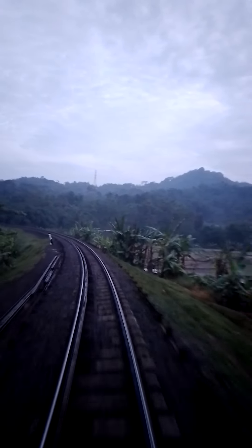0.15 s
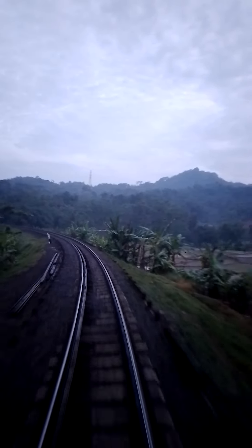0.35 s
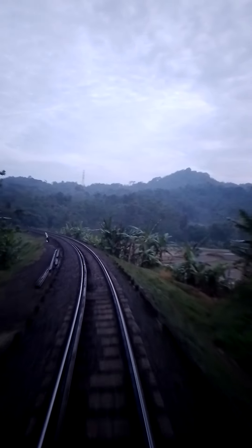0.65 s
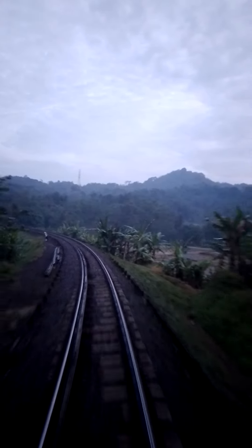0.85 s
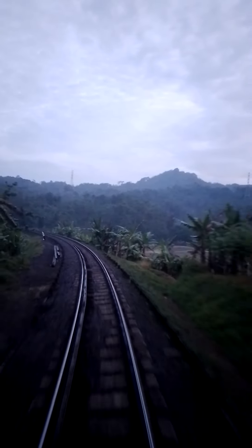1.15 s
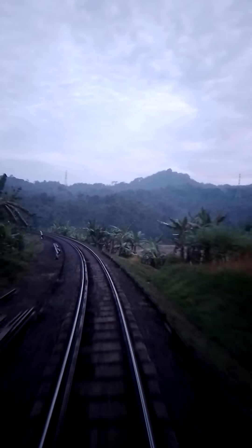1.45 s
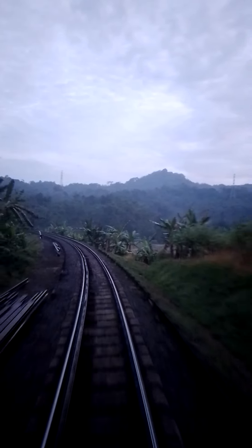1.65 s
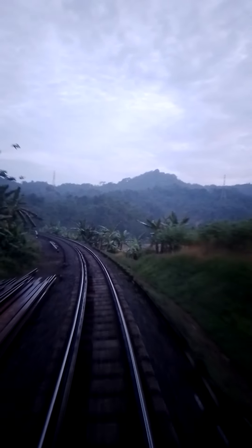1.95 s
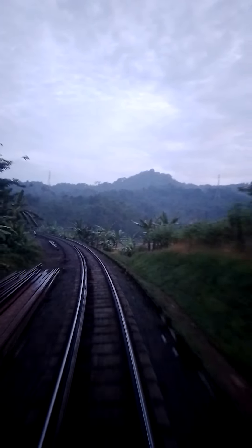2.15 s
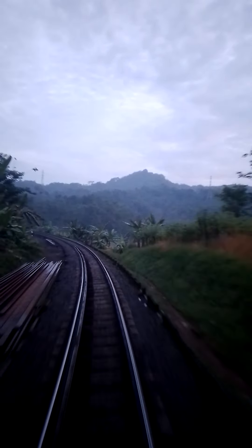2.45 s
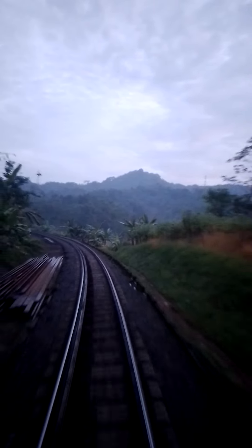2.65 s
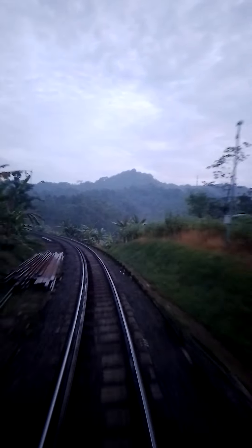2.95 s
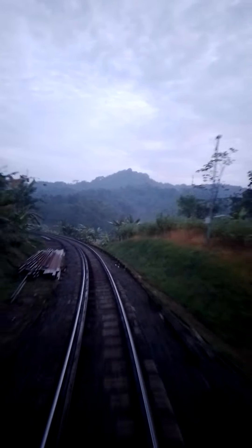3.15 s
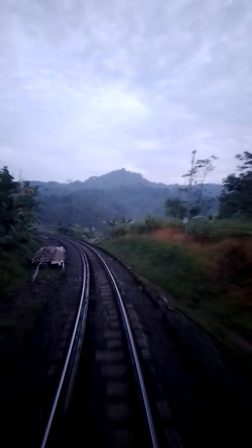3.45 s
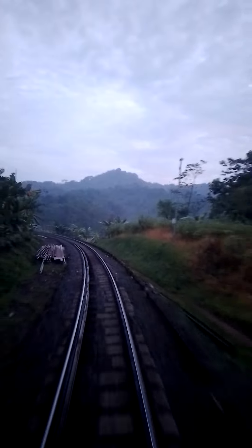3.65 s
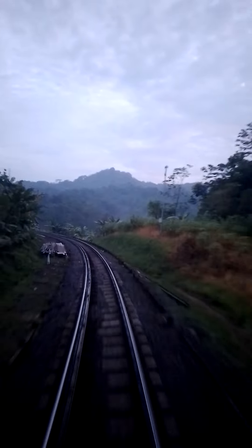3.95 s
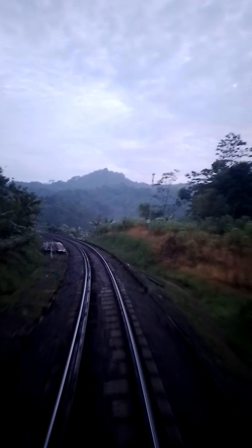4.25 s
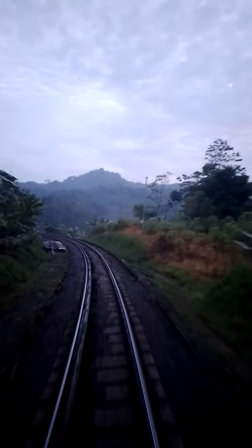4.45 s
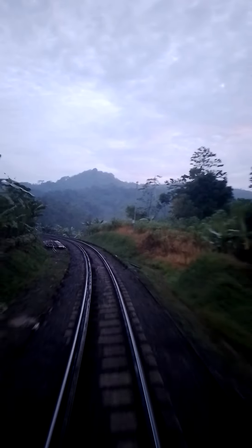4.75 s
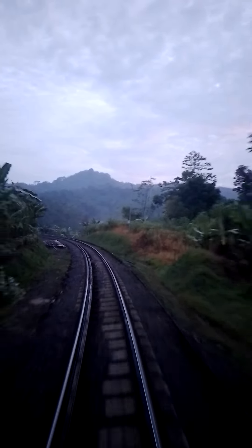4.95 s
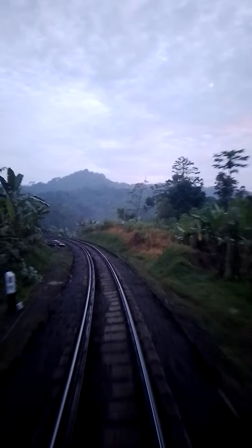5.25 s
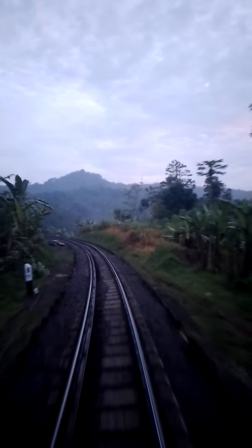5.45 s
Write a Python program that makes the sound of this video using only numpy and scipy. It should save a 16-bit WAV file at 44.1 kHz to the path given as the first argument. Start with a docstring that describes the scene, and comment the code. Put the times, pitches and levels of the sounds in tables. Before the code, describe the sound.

A train rounds a curve, heard in stereo inside its small cab. From the start a thick low rumble, strongest around the boomy low-mids, shakes unevenly, with brief panel drones and frequent dull thumps. Over it steel grinds in a rough, fluttering growl with fine grit. A sharp high squeal opens the sound; thinner, fuzzy, wavering squeals follow, notably around 0.9, 1.65 to 2.3, 2.7 to 3.1 and 3.3 seconds. Joint clatter with light clanks comes at 0.2 and 1.3; the loudest, a rapid cluster of steel blows with scrape and hiss, hits at 1.95, then another at 2.45 and a weaker one at 2.9. From 3.8 to 4.2 come more knocks, growl, hiss and a last clear squeal. At about 4.3 the noise eases quickly, leaving subdued rumble, faint hum and whine, a soft thump near 4.9, a small swell of roar at 5.1, and a slight rattle at the end.

```python
"""A low rumble and thumps on uneven rail, under a grinding growl and thin squeals, inside a train cab on a curve.
The wheels shake the body as shaped noise and ring its modes; rail joints set off bursts of clatter and clanks.
The flanges hiss and squeal on the rail until the noise eases off at about 4.3 s; hum, whine and roar lie behind.
Two microphone ports in the cab, each with its own treble resonance, pick up the sound."""
import sys
import numpy as np
from scipy import signal
from scipy.fft import rfft, irfft
from scipy.io import wavfile

SR = 44100
rng = np.random.default_rng(int(sys.argv[2]) if len(sys.argv) > 2 else 0)


def unload_wav(signal):
    """Save mono or channel-first audio to the path in sys.argv[1] as 16-bit WAV at rate SR, clipped to [-1, 1]."""
    wavfile.write(
        sys.argv[1],
        SR,
        np.round(np.clip(np.atleast_2d(signal).T, -1, 1) * 32767).astype(np.int16),
    )


N = 246519
TIME = np.arange(N) / SR
BINS_HZ = np.fft.rfftfreq(N, 1 / SR)

# All levels are relative: each source sets its own gain on top.
# rolling force on the car body: (time [s], level [dB])
ROLLING_FORCE = [(0.0, -18), (0.15, -23.5), (0.31, -22), (0.36, -27.5), (0.67, -24.5), (0.75, -29),
                 (0.86, -20), (0.9, -23), (1.06, -22.5), (1.1, -23.5), (1.35, -24.5), (1.51, -28),
                 (1.58, -23), (1.68, -26), (1.78, -22.5), (2.02, -19.5), (2.15, -26.5), (2.41, -26),
                 (2.46, -20), (2.66, -30.5), (2.74, -23), (2.9, -25.5), (2.97, -19.5), (3.13, -27.5),
                 (3.35, -24.5), (3.44, -25.5), (3.49, -19), (3.61, -27), (3.67, -21), (3.74, -25.5),
                 (4.0, -20), (4.16, -20.5), (4.25, -31.5), (4.3, -22), (4.45, -32.5), (5.03, -32.5),
                 (5.2, -33.5), (5.28, -40.5), (5.43, -38.5), (5.57, -31)]
# spectrum of the rumble: (frequency [Hz], density [dB per Hz])
RUMBLE_SPECTRUM = [(25, -60), (60, -54), (105, -35), (138, -27), (162, -30.5), (200, -29), (225, -12),
                   (275, -3.5), (335, -1), (400, -9), (480, -12), (580, -15), (700, -30), (1000, -30.5),
                   (2000, -55)]
# floor modes, the low one first: (frequency [Hz], width [Hz], level [dB])
FLOOR_MODES = [(137.5, 18, -18), (279.6, 26, 2.5)]
# cab panels that colour the rolling noise: (frequency [Hz], width [Hz], lift [dB])
PANEL_MODES = [(190.7, 18, 11.5), (430, 8.7, 3.5), (472, 9.4, 4.5), (640, 9.4, 3), (740, 10, 7),
               (825, 18, 0), (1448, 66, 2), (1537, 38, 2.5), (2123, 28, 5.5), (2310, 23, 6),
               (2505, 51, 3.5)]
# the loudest thumps of the running gear: (time [s], level [dB], hardness [dB per octave])
THUMPS = [(0.039, -0.5, -7), (0.109, -3.5, -4), (0.183, 2.5, 25), (0.203, -2, -7), (0.245, -3, -5),
          (0.308, 0, -1), (0.539, -4, -5), (0.639, -5, -4), (0.662, -6, -2), (0.802, -3, -3), (0.85, 2, 13),
          (0.977, 2, -5), (1.022, -1, -7), (1.048, 3, -5), (1.257, 1.5, -10), (1.338, -0.5, 33),
          (1.556, -4.5, -18), (1.75, 2, -6), (1.79, 0.5, -4), (1.851, -3.5, 0), (1.872, -3, 7),
          (1.902, 1, -3), (2.021, -4, -10), (2.071, -5, -9), (2.179, -6, -7), (2.803, -7, -10),
          (2.877, -2, 20), (2.926, 2, 12), (3.005, -1, 5), (3.075, -3.5, 2), (3.168, -5, 2), (3.486, 4, 0),
          (3.545, -2, 0), (3.703, -2.5, 2), (3.862, 0.5, -6), (4.024, 3.5, -8), (4.1, 0, -5),
          (4.287, 1.5, -31), (4.458, -16, 5), (4.875, -7, -1), (5.039, -9.5, -23)]
# car body under a thump: (frequency [Hz], level [dB], decay by 60 dB [s])
BODY_MODES = [(307, -5, 0.037), (327, 11.5, 0.053), (347, 19, 0.039), (448, 1, 0.074)]
# spectra of grinding, low growl and fine grit: (frequency [Hz], density [dB per Hz])
GROWL_SPECTRUM = [(200, -14), (420, 13), (620, 5.5), (830, 4), (1150, 0.5), (1500, 0.5), (1850, -3),
                  (2250, -1.5), (2700, -20), (3300, -68), (6000, -35)]
GRIT_SPECTRUM = [(1500, -13.5), (2800, 4), (3350, -1), (3800, -1), (4400, -4), (5300, -3.5), (6500, -9.5),
                 (9000, -5), (14000, -29)]
# the growl turns darker or brighter as the contact patch shifts: (time [s], tilt [dB])
GROWL_TILT = [(0, 5), (0.6, -0.5), (1.4, -2), (1.75, -0.5), (2.3, 3.5), (2.8, 0), (3.25, 2.5), (3.7, -1.5),
              (4.2, 3), (4.6, 0.5), (5.42, 3.5)]
# the wheels scrape harder for a moment: (start [s], hold [s], growl level [dB], grit level [dB])
SCRAPES = [(0.0, 0.11, -37, -50.5), (0.197, 0.13, -38, -56), (0.4, 0.13, -41, -71),
           (0.566, 0.055, -37, -56), (0.93, 0.2, -38.5, -55.5), (1.146, 0.058, -35.5, -57),
           (1.237, 0.19, -38, -61.5), (1.79, 0.17, -34.5, -53), (1.957, 0.042, -29.5, -40.5),
           (2.037, 0.11, -40, -58), (2.204, 0.14, -39, -59), (2.442, 0.058, -29.5, -46),
           (2.655, 0.13, -40.5, -88), (2.85, 0.096, -38.5, -59), (2.966, 0.072, -33.5, -55),
           (3.13, 0.15, -39.5, -62), (3.297, 0.037, -38.5, -55), (3.944, 0.086, -34, -51.5),
           (4.107, 0.074, -32, -52.5), (4.274, 0.035, -35.5, -70), (5.555, .04, -43, -74)]
# a flange bites and squeals: (start [s], hold [s], level [dB], pitch before bend and drift [Hz], mode name)
SQUEALS = [(0.0, 0.078, -39, 10200, "high"), (0.002, 0.057, -58, 12100, "top"),
           (0.025, 0.061, -38, 7110, "main"), (0.15, 0.076, -50, 10700, "high"),
           (0.154, 0.15, -46, 7380, "main"), (0.372, 0.28, -59, 7460, "thin"),
           (0.44, 0.2, -54.5, 10660, "high"), (0.669, 0.28, -52.5, 7370, "thin"),
           (0.931, 0.5, -43, 7450, "main"), (0.978, 0.22, -50, 10600, "high"),
           (1.168, 0.065, -47, 10560, "keen"), (1.643, 0.08, -49.5, 10500, "high"),
           (1.651, 0.24, -44.5, 7430, "main"), (1.74, 0.26, -39, 7180, "main"),
           (1.815, 0.07, -45, 6000, "low"), (1.85, 0.12, -46, 10300, "high"), (2, 0.05, -51, 5300, "rasp"),
           (1.94, 0.16, -43.5, 10280, "high"), (1.96, 0.054, -44, 5900, "rasp"),
           (1.962, 0.14, -37, 8010, "main"), (1.97, 0.07, -47, 5200, "rasp"),
           (2.064, 0.06, -47, 6140, "rasp"), (2.177, 0.15, -39.5, 7040, "main"),
           (2.193, 0.05, -44, 6160, "rasp"), (2.214, 0.093, -43, 10330, "keen"),
           (2.26, 0.048, -49.5, 6020, "low"), (2.451, 0.14, -49, 10470, "keen"),
           (2.454, 0.21, -45, 7000, "main"), (2.711, 0.045, -38.5, 6870, "main"),
           (2.713, 0.037, -42, 7100, "thin"), (2.749, 0.13, -54, 6130, "low"),
           (2.864, 0.044, -40.5, 6950, "main"), (2.866, 0.055, -43, 7140, "thin"),
           (2.886, 0.04, -48, 6200, "low"), (2.949, 0.11, -49, 6250, "rasp"),
           (2.979, 0.076, -41, 7270, "main"), (3.099, 0.13, -46, 7000, "main"),
           (3.329, 0.087, -37, 6880, "main"), (3.475, 0.037, -48, 7010, "thin"),
           (4.007, 0.086, -49, 7230, "thin"), (4.08, 0.11, -45, 7290, "thin"),
           (4.5, 0.092, -60, 12900, "top"), (4.136, 0.088, -40, 7230, "main"),
           (4.141, 0.083, -51, 5860, "ring")]
# wheel modes: name -> (left [dB], right [dB], fuzz width [Hz], whistle width [Hz], whistle level [dB])
WHEEL_MODES = {"rasp": (-1, -19, 800, 200, -14), "low": (0, -17, 420, 100, -4),
               "ring": (0, -19, 260, 55, 13), "main": (-8.5, -23, 816, 111, -26),
               "thin": (-6, -23, 305, 113, 1.5), "high": (-21, -2, 1200, 200, -23),
               "keen": (-13, -3, 550, 160, -22), "top": (-1, 19.5, 1300, 250, -14)}
# flange sliding along the rail head: (time [s], hiss level [dB])
SLIDING = [(0.0, -38.5), (0.08, -64), (0.2, -60), (1.9, -52.5), (2.01, -52), (2.22, -60), (2.43, -63),
           (2.48, -65), (2.69, -64), (3.01, -56), (3.27, -71), (3.75, -88), (4.18, -50), (4.33, -70),
           (4.78, -79), (4.95, -60.5), (5.26, -82), (5.59, -67)]
# spectrum of the flange hiss: (frequency [Hz], density [dB per Hz])
HISS_SPECTRUM = [(3500, -1.5), (5500, 1), (6500, -3), (8000, 0), (9500, 4), (11000, -2), (12500, 1),
                 (14200, 5)]
# clatter over rail joints: (time [s], level [dB], decay by 60 dB [s])
JOINTS = [(0.181, -30, 0.15), (0.584, -46, 0.26), (1.324, -28, 0.19), (1.939, -17.5, 0.13),
          (2.445, -22, 0.14), (2.915, -33, 0.41), (3.815, -34, 0.26), (3.964, -35, 0.2), (4.119, -25, 0.21),
          (5.55, -43.5, 0.25)]
# spectrum of the clatter: (frequency [Hz], density [dB per Hz])
CLATTER_SPECTRUM = [(200, -23), (400, 15.5), (600, 7), (850, 1.5), (1300, -2), (2300, -4), (3200, -26),
                    (6000, -35)]
# steel strikes steel at the worst joints: (time [s], level [dB])
CLANKS = [(0.19, -28.5), (1.343, -26), (1.944, -19.5), (1.955, -15), (1.966, -16.5), (1.979, -19),
          (1.989, -22), (2.449, -23), (2.458, -32), (2.475, -29), (2.492, -28), (2.955, -27),
          (3.826, -33.5), (3.975, -29), (4.133, -24.5), (4.157, -26)]
# bogie frame under a clank, before detuning: (frequency [Hz], level [dB], decay by 60 dB [s])
FRAME_MODES = [(382, -0.5, 0.1), (509, -5.5, 0.13), (566, -10.5, 0.13), (647, -8, 0.12), (829, -7, 0.22),
               (961, -11.5, 0.087), (1126, -14, 0.09), (1298, -16.5, 0.074), (1440, -14, 0.097),
               (1630, -10.5, 0.089), (2324, -15, 0.089), (2560, -15, 0.096)]
# shaking sets one part of the shell droning: (start [s], hold [s], level [dB], mode name)
DRONES = [(0.0, 0.054, -20, "floor"), (0.11, 0.15, -19.5, "floor"), (0.115, 0.18, -30, "window"),
          (0.13, 0.083, -21.5, "wall"), (0.22, 0.11, -25.5, "roof"), (0.51, 0.081, -25.5, "roof"),
          (0.6, 0.074, -28, "door"), (0.81, 0.056, -22, "door"), (0.815, 0.051, -30, "window"),
          (0.95, 0.09, -21, "door"), (0.99, 0.078, -22.5, "floor"), (1.03, 0.099, -29.5, "wall"),
          (1.1, 0.053, -24.5, "door"), (1.17, 0.13, -28.5, "roof"), (1.66, 0.25, -27.5, "floor"),
          (1.72, 0.066, -28, "desk"), (1.92, 0.057, -21, "desk"), (1.93, 0.031, -22.5, "screen"),
          (1.96, 0.12, -20, "floor"), (2.03, 0.09, -29, "wall"), (2.82, 0.19, -28, "roof"),
          (2.91, 0.067, -30.5, "window"), (3.2, 0.083, -28, "desk"), (3.28, 0.083, -29, "roof"),
          (3.63, 0.073, -25, "roof"), (3.95, 0.19, -30, "wall"), (3.97, 0.065, -26.5, "roof"),
          (4.1, 0.05, -28, "window")]
# ringing modes of the cab shell: name -> (frequency before waver [Hz], phase between the ports [rad])
SHELL_MODES = {"floor": (275, 0.35), "roof": (299, 0.37), "door": (325, 0.33), "desk": (366, 0.46),
               "wall": (422, 0.9), "window": (474, 1.24), "screen": (513, 0.96)}
# roar of the track bed: spectrum (frequency [Hz], density [dB per Hz])
ROAR_SPECTRUM = [(400, -28), (600, 0.5), (900, -5.5), (1100, -26), (2000, -62)]
# and its course: (time [s], level [dB])
ROAR_LEVEL = [(0, -49), (4.38, -46), (4.6, -52), (4.8, -57), (5.05, -53), (5.11, -45.5), (5.22, -51),
              (5.3, -57), (5.44, -66), (5.59, -47)]
# whine of the traction gear: (frequency before waver [Hz], level [dB])
WHINE_TONES = [(780.6, -62.5), (2121, -80)]
# steady hum of the cab: (frequency [Hz], width [Hz], level [dB])
HUM_MODES = [(134.6, 23, -58), (235.7, 19, -44)]
# spectrum of the cab's low drone: (frequency [Hz], density [dB per Hz])
CAB_SPECTRUM = [(25, -35), (60, -11), (110, -11), (165, -21), (220, 0), (300, -4), (380, 2.5), (550, -7),
                (780, -29), (950, -44), (2000, -73)]
# likeness of the two ports: (frequency [Hz], coherence)
PORT_LIKENESS = [(60, 0.92), (250, 0.91), (340, 0.9), (430, 0.39), (600, -0.085), (1100, -0.13),
                 (1700, -0.09), (2400, 0.014)]
# sound that comes straight from the right-hand rail: (frequency [Hz], share)
DIRECT_SHARE = [(380, 0.0082), (800, 0.08), (2800, 0.15), (6000, 0.14), (12000, 0.0022)]
# colour of each microphone port: (frequency [Hz], gain [dB])
LEFT_PORT = [(300, 0.5), (1100, 2), (1500, 3.5), (2300, -2.5), (4500, -0.5), (5600, 3), (6700, 9.5),
             (7450, 13), (8300, 1), (9100, -6), (11000, -6), (14000, -11.5)]
RIGHT_PORT = [(300, 1), (1100, 2), (1500, -2), (2300, 0), (4500, -0.5), (6500, 2), (8000, -3.5), (9100, -3),
              (9650, 3), (10400, 8.5), (11400, 4.5), (12200, -3), (14000, -5)]

USUAL_ROLLING_DB = -23
EASE_AT_S, EASE_S = 4.33, 0.08  # the flanges stop pressing: middle and length of the change
SQUEAL_RISE_S, SQUEAL_T60_S, SQUEAL_SAG_HZ_PER_S = 0.0049, 0.55, 180
BITE_SHARP, BITE_S = 0.012, 0.07  # a squeal starts sharp by this share, and settles
LEFT_LAG_S = 20.5 / SR  # direct sound reaches the left port this much later
EDGE_HZ = 14300  # upper band limit


def rumble(level_db, sway_db, throb_db):
    """Rail roughness shakes the car body unevenly; the floor sways in its low mode and booms in its upper one."""
    roar = patchy(noise(panelled(RUMBLE_SPECTRUM)), depth_db=3, width_hz=14, span_s=0.07, size=4096)
    roar = steadied(roar, span_s=0.025)
    deep = low_part(roar, edge_hz=890)
    # duller on smooth running
    roar = deep + (roar - deep) * pressing(level_db=0.5, follow=0.055, eased_db=-16.0)
    roar = roar * amp(curve(ROLLING_FORCE) + level_db + throb_db * wander(42.0))

    low, upper = (amp(db) * steadied(noise(bell(hz, width)), span_s=0.039) for hz, width, db in FLOOR_MODES)
    shocks = [(start, hold, db) for start, hold, db, mode in DRONES if mode == "floor"]
    swaying = pressing(level_db=-34.0, follow=0.38, eased_db=-12.0)
    swaying = swaying + bursts(shocks, rise_s=0.018, t60_s=0.82) * amp(sway_db)
    booming = pressing(level_db=-43.5, follow=0.6, eased_db=-2.5)
    return roar + low * swaying + upper * booming


def thumps(level_db, rise_s):
    """Each bump of the running gear rings the low modes of the body; hard ones favour the upper modes."""
    t = np.arange(SR // 4) / SR
    rings = np.array([amp(db - 60 * t / t60) * np.sin(2 * np.pi * hz * t) for hz, db, t60 in BODY_MODES])
    rings = rings * (1 - np.exp(-(t / rise_s) ** 2))
    octaves = np.log2([hz / BODY_MODES[1][0] for hz, _, _ in BODY_MODES])
    out = np.zeros(N + len(t))
    for start, db, hardness in THUMPS:
        out[round(start * SR):][:len(t)] += amp(db + hardness * octaves) @ rings
    return out[:N] * amp(level_db) / abs(rings.sum(0)).max()


def grinding(growl_db, grit_db, chatter_db, pivot_hz, rise_s, t60_s):
    """Steel grinds on steel in quick uneven slips: a growl with fine grit above it, swelling at each scrape."""
    slips = amp(chatter_db * wander(54))
    growl = patchy(noise(panelled(GROWL_SPECTRUM)), depth_db=2.5, width_hz=45, span_s=0.05, size=2048)
    dark = low_part(growl, pivot_hz)
    tilt = amp(curve(GROWL_TILT))
    growl = dark / tilt + (growl - dark) * tilt

    growl_scrapes = bursts([(start, hold, db) for start, hold, db, _ in SCRAPES], rise_s, t60_s)
    growl_scrapes = growl_scrapes * pressing(level_db=0, follow=0, eased_db=-7.0)
    grit_scrapes = bursts([(start, hold, db) for start, hold, _, db in SCRAPES], rise_s, t60_s)
    growl_level = np.hypot(pressing(level_db=-47.5, follow=0.19, eased_db=-6.0), growl_scrapes)
    grit_level = np.hypot(pressing(level_db=-60.0, follow=0.2, eased_db=-3.5), grit_scrapes)

    growl = growl * growl_level * amp(growl_db)
    grit = noise(panelled(GRIT_SPECTRUM)) * grit_level * amp(grit_db)
    return slips * (growl + grit)


def squeals(waver_hz, drift_hz, flutter_db, swell_db):
    """Each bite of a flange swells unevenly, holds and rings out, drifting and sagging a little in pitch."""
    waver = waver_hz * wander(27)
    drift = drift_hz * wander(19)
    swells = {mode: amp(swell_db * wander(27)) for mode in WHEEL_MODES}
    out = np.zeros((2, N))
    for start, hold, db, hz, mode in SQUEALS:
        span = slice(max(round(start * SR), 0), round((start + hold + SQUEAL_T60_S) * SR))
        age = TIME[span] - start
        pitch = hz * (1 + BITE_SHARP * np.exp(-age / BITE_S)) - SQUEAL_SAG_HZ_PER_S * (age - hold / 2)
        ring = wheel_ring(mode, pitch, waver[span], drift[span])
        level = amp(db) * swells[mode][span] * envelope(age, hold, SQUEAL_RISE_S, SQUEAL_T60_S)
        out[:, span] += ring * level
    return out * amp(flutter_db * wander(58)) * pressing(level_db=0.5, follow=0.062, eased_db=-11)


def wheel_ring(mode, hz, waver_hz, drift_hz):
    """Stick-slip drives one wheel mode: a thin wavering whistle inside a fuzzy band."""
    left_db, right_db, fuzz_width, whistle_width, whistle_db = WHEEL_MODES[mode]
    fuzz, whistle = rng.standard_normal((2, 2, 2 * SR))[..., :len(hz)]
    fuzz = unit(resonate(fuzz, hz + drift_hz, fuzz_width))
    whistle = unit(resonate(whistle, hz + waver_hz, whistle_width))
    return unit(fuzz + amp(whistle_db) * whistle) * amp([[left_db], [right_db]])


def flange_hiss(flutter_db, pivot_hz, top_db, dulling_db_per_s):
    """The sliding flange gives a wide, bright hiss whose top dulls along the curve."""
    hiss = noise(amp(read(HISS_SPECTRUM)))
    dark = low_part(hiss, pivot_hz)
    hiss = dark + (hiss - dark) * amp(top_db - dulling_db_per_s * TIME)
    level = amp(curve(SLIDING) + flutter_db * wander(36))
    return hiss * level * pressing(level_db=9.5, follow=0.14, eased_db=-1.0)


def joints(level_db, rise_s, hold_s, rattle_db):
    """A wheel drops over a joint; the bogie rattles hard for a moment, then dies down."""
    force = sum(amp(db) * envelope(TIME - start, hold_s, rise_s, t60) for start, db, t60 in JOINTS)
    clatter = steadied(noise(panelled(CLATTER_SPECTRUM)), span_s=0.0067)
    return clatter * force * amp(level_db + rattle_db * wander(180))


def clanks(level_db, rise_s, detune):
    """Each blow rings the bogie frame, a little differently each time and at each port."""
    t = np.arange(SR // 4) / SR
    hz, db, t60 = np.transpose(FRAME_MODES)[:, :, None]
    out = np.zeros((2, N))
    for start, blow_db in CLANKS:
        pitch, left, right = rng.uniform(-0.92, 1, (3, len(hz), 1))
        turns = hz * (1 + detune * pitch) * t + np.array([left, right]) / 2
        rings = amp(blow_db + db - 60 * t / t60) * np.sin(2 * np.pi * turns)
        out[:, round(start * SR):][:, :len(t)] += rings.sum(1) * (1 - np.exp(-(t / rise_s) ** 2))
    return out * amp(level_db)


def drones(level_db, rise_s, t60_s, waver_hz, throb_db):
    """Each part of the shell rings almost purely while it is shaken, wavering in pitch and strength."""
    waver = waver_hz * wander(15)
    throb = amp(throb_db * wander(22))
    out = np.zeros((2, N))
    for start, hold, db, mode in DRONES:
        hz, port_phase = SHELL_MODES[mode]
        span = slice(max(round(start * SR), 0), round((start + hold + t60_s) * SR))
        phase = 2 * np.pi * (np.cumsum(hz + waver[span]) / SR + rng.random())
        ring = np.sqrt(2) * np.sin([phase, phase + port_phase])
        out[:, span] += ring * amp(db) * envelope(TIME[span] - start, hold, rise_s, t60_s)
    return out * throb * amp(level_db)


def track_roar(level_db):
    """The track bed roars more or less as the ground under the train changes."""
    return noise(amp(read(ROAR_SPECTRUM))) * amp(curve(ROAR_LEVEL) + level_db)


def whine(waver, flutter_db, port_phase):
    """The traction gear sings faint, wavering tones that sink away as the rolling force falls."""
    running_s = np.cumsum(1 + waver * wander(11.5)) / SR
    phases = np.array([[0], [port_phase]])
    tones = sum(amp(db) * np.sin(2 * np.pi * hz * running_s + phases) for hz, db in WHINE_TONES)
    return np.sqrt(2) * tones * amp(flutter_db * wander(12)) * pressing(level_db=4.5, follow=0.57, eased_db=0)


def cab(air_db):
    """The steady low drone of the cab with a few humming resonances."""
    hum = sum(amp(db) * noise(bell(hz, width)) for hz, width, db in HUM_MODES)
    return hum + amp(air_db) * noise(amp(read(CAB_SPECTRUM)))


def reflected(x, share, count=14):
    """Windows and walls of the small cab send back early echoes, different at each port."""
    taps = np.zeros((2, SR // 50))
    taps[:, 0] = 1
    for port in taps:
        port[rng.integers(30, len(port), count)] = share * rng.choice([-1, 1], count) / np.sqrt(count)
    return signal.oaconvolve(x, taps, axes=1)[:, :N] / np.sqrt(1 + share ** 2)


def noise(gain):
    """Coloured noise in the cab: the ports share the bass, and a little treble reaches the right one first."""
    a, b = rfft(rng.standard_normal((2, N)))
    same = read(PORT_LIKENESS) + read(DIRECT_SHARE) * np.exp(2j * np.pi * BINS_HZ * LEFT_LAG_S)
    apart = np.sqrt(np.maximum(1 - abs(same) ** 2, 0))
    return unit(irfft(np.array([a, same * a + apart * b]) * gain, N))


def panelled(spectrum):
    """Gain of a spectrum that reaches the cab through its ringing panels."""
    return amp(read(spectrum) + sum(db * bell(hz, width) for hz, width, db in PANEL_MODES))


def bell(hz, width):
    """Gain of one resonance over frequency."""
    return 1 / (1 + (2 * (BINS_HZ - hz) / width) ** 2)


def patchy(x, depth_db, width_hz, span_s, size):
    """Short-lived resonances come and go at random places in the spectrum."""
    z = signal.stft(x, nperseg=size, noverlap=size * 3 // 4)[2]
    field = rng.standard_normal(z.shape[1:])
    # smooth the random field over frequency, then over time
    for axis, cells in enumerate([width_hz * size / SR, span_s * SR / (size // 4)]):
        window = np.exp(-(np.arange(-40, 41) / cells) ** 2)
        field = signal.fftconvolve(field, np.expand_dims(window, 1 - axis), "same")
    gain = unit(amp(depth_db * np.clip(unit(field), -2, 2)))
    return signal.istft(z * gain, nperseg=size, noverlap=size * 3 // 4)[1][:, :N]


def steadied(x, span_s):
    """Evens out the slow swells of a noise and leaves its fast flutter."""
    window = np.exp(-(np.arange(-SR // 4, SR // 4) / SR / span_s) ** 2)
    power = signal.fftconvolve((x ** 2).mean(0), window / window.sum(), "same")
    return unit(x / np.sqrt(abs(power) + 1e-6))


def resonate(x, hz, width):
    """A resonance that follows the curve hz, with steep skirts."""
    turn = np.exp(2j * np.pi * np.cumsum(hz) / SR)
    r = np.exp(-np.pi * abs(width) / SR)
    # shift the pitch down to zero, filter there, shift back
    return (turn * signal.lfilter([(1 - r) ** 2], [1, -2 * r, r * r], x / turn)).real


def low_part(x, edge_hz):
    """The part of a sound below edge_hz."""
    return irfft(rfft(x) / (1 + (BINS_HZ / edge_hz) ** 10), N)


def pressing(level_db, follow, eased_db):
    """A gain that follows the rolling force and shifts by eased_db once the flanges stop pressing."""
    eased = np.clip((TIME - EASE_AT_S) / EASE_S + .5, 0, 1)
    return amp(level_db + follow * (curve(ROLLING_FORCE) - USUAL_ROLLING_DB) + eased_db * eased)


def envelope(age, hold_s, rise_s, t60_s):
    """Attack, hold and release of one event, over its age in seconds."""
    age = np.maximum(age, 0)
    return (1 - np.exp(-age / rise_s)) * amp(-60 * np.maximum(age - hold_s, 0) / t60_s)


def bursts(rows, rise_s, t60_s):
    """Joint level of events (start [s], hold [s], level [dB]) that share one attack and release."""
    t = TIME[::32]  # coarse steps are enough for a level
    power = sum((amp(db) * envelope(t - start, hold, rise_s, t60_s)) ** 2 for start, hold, db in rows)
    return np.interp(TIME, t, np.sqrt(power))


def wander(rate_hz):
    """Slow chance of rms 1."""
    return unit(irfft(rfft(rng.standard_normal(N)) * np.exp(-(BINS_HZ / rate_hz) ** 2), N))


def curve(rows):
    """A table over time, at every sample."""
    return np.interp(TIME, *np.transpose(rows))


def read(points):
    """A table over frequency, joined on a log axis."""
    hz, value = np.transpose(points)
    return np.interp(np.log(BINS_HZ + 1), np.log(hz + 1), value)


def unit(x):
    """Scales to rms 1."""
    return x / np.sqrt(np.mean(x ** 2) + 1e-20)


def amp(db):
    """Decibels to gain."""
    return 10 ** (np.asarray(db) / 20)


def scene():
    """Body, running gear and squealing wheels together; only the wheels get echoes off the cab walls."""
    body = rumble(level_db=-1.48, sway_db=-11, throb_db=1.39)
    body += thumps(level_db=-14.5, rise_s=0.0058)
    body += drones(level_db=-0.5, rise_s=0.0098, t60_s=0.26, waver_hz=3.6, throb_db=1.1)
    body += track_roar(level_db=-1.5)
    body += whine(waver=0.00304, flutter_db=2.5, port_phase=1.1)
    body += cab(air_db=-44.0)

    gear = grinding(growl_db=2.5, grit_db=5.5, chatter_db=0.66, pivot_hz=1500, rise_s=0.0087, t60_s=0.58)
    gear += joints(level_db=-5.0, rise_s=0.0038, hold_s=0.035, rattle_db=1.0)
    gear += clanks(level_db=-0.5, rise_s=0.0023, detune=0.031)

    wheels = squeals(waver_hz=25.2, drift_hz=60, flutter_db=0.5, swell_db=0.56)
    wheels += flange_hiss(flutter_db=0.5, pivot_hz=10700, top_db=5.5, dulling_db_per_s=7.0)
    wheels = reflected(wheels, share=.35)
    wheels = patchy(wheels, depth_db=2.5, width_hz=85, span_s=0.04, size=1024)
    return body + gear + wheels


def record(dry):
    """Each microphone port adds its own treble resonance; then short end fades and the band limit."""
    ports = irfft(amp([read(LEFT_PORT), read(RIGHT_PORT)]), N)
    ports = np.roll(ports, 200, axis=1)[:, :401] * np.hanning(401)  # centred, short filters
    fade = np.minimum(np.minimum(TIME, TIME[::-1]) / .003, 1)
    heard = signal.oaconvolve(dry, ports, "same", axes=1) * fade
    band_limit = signal.firwin(801, EDGE_HZ, window=("kaiser", 9), fs=SR)
    return signal.oaconvolve(heard, band_limit[None], "same")


dry = scene()
out = record(dry)
unload_wav(out)
```